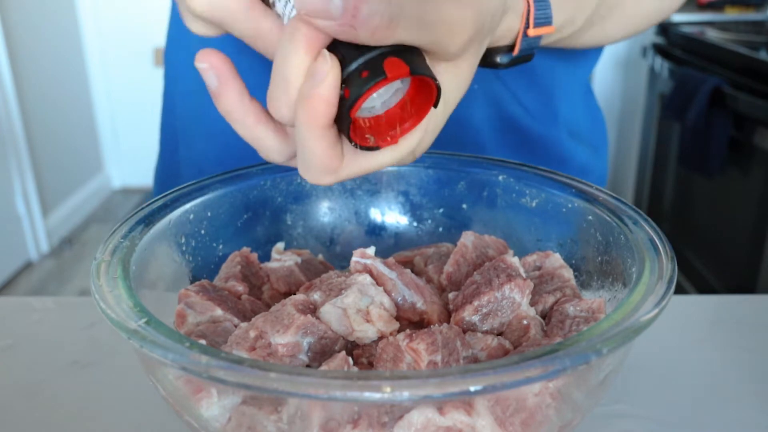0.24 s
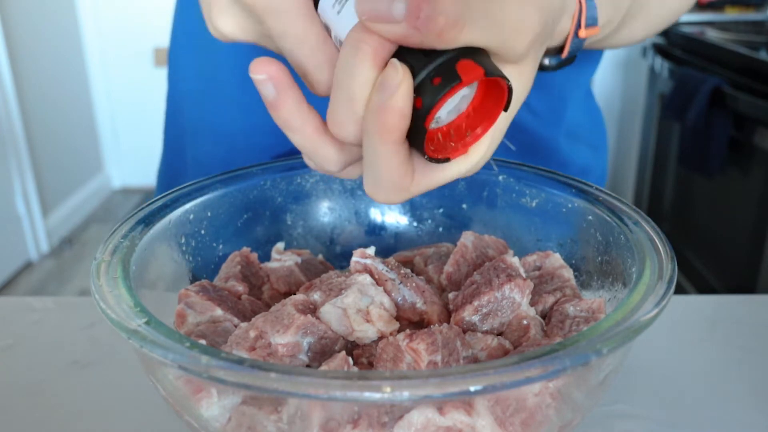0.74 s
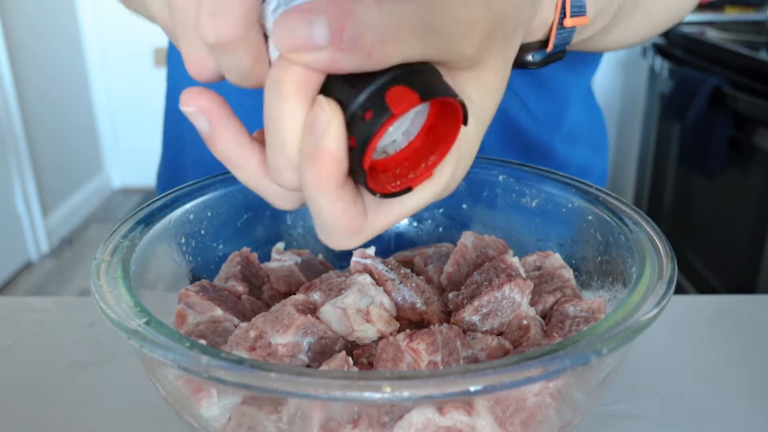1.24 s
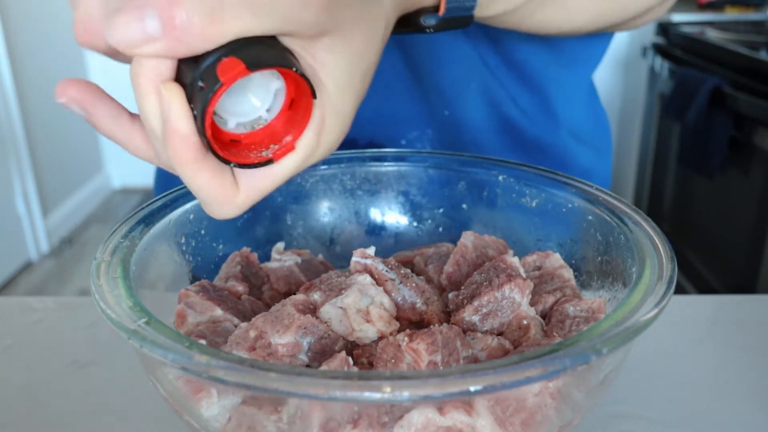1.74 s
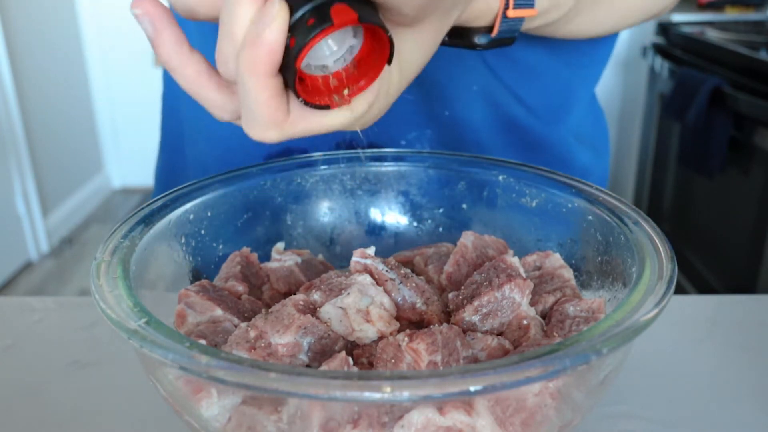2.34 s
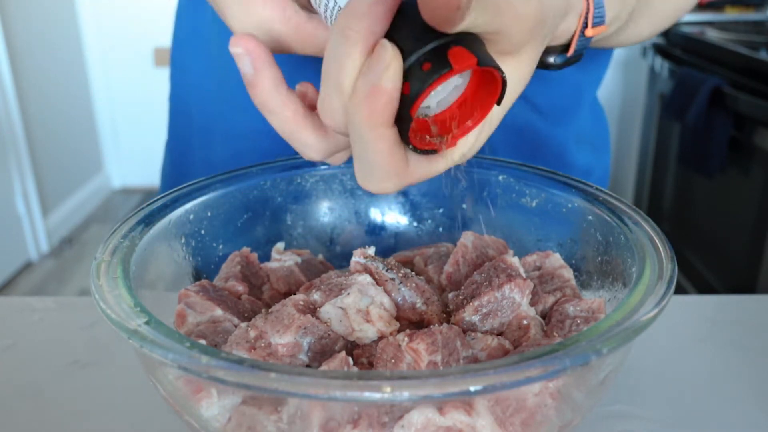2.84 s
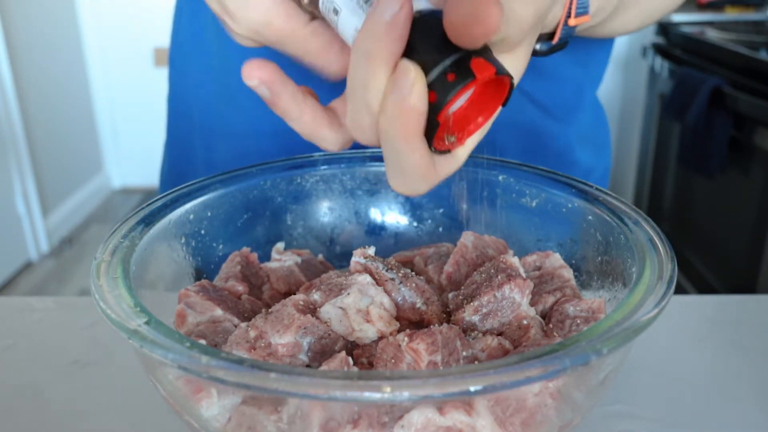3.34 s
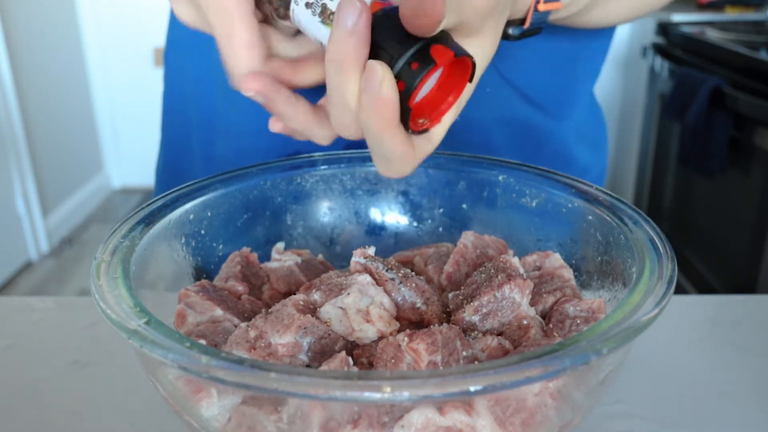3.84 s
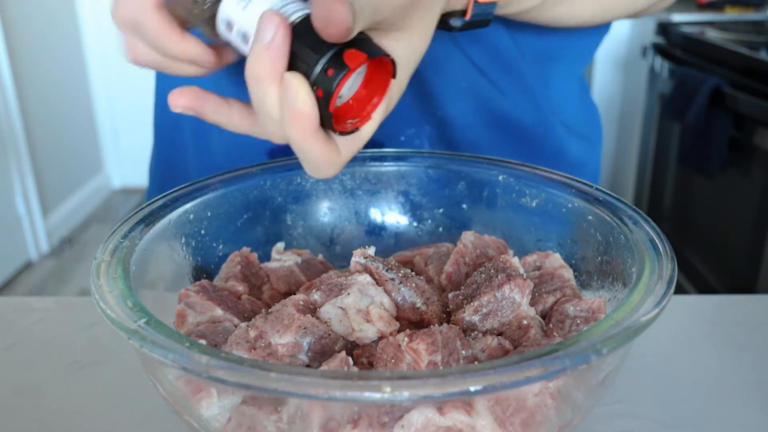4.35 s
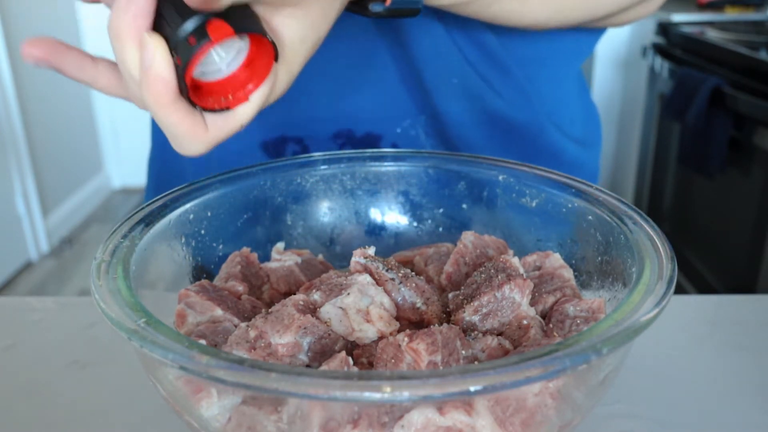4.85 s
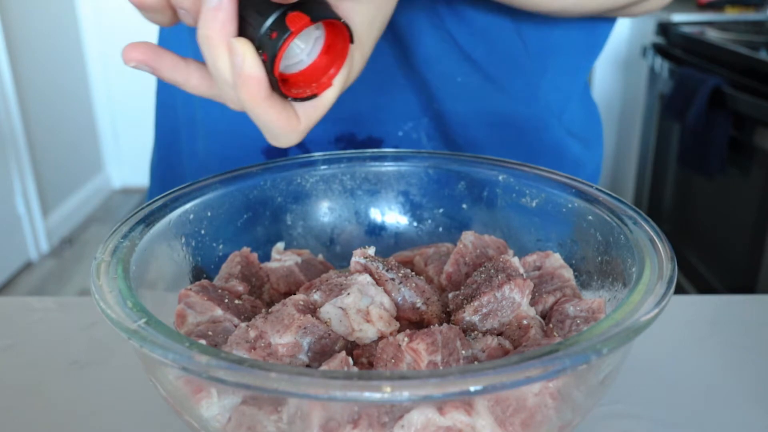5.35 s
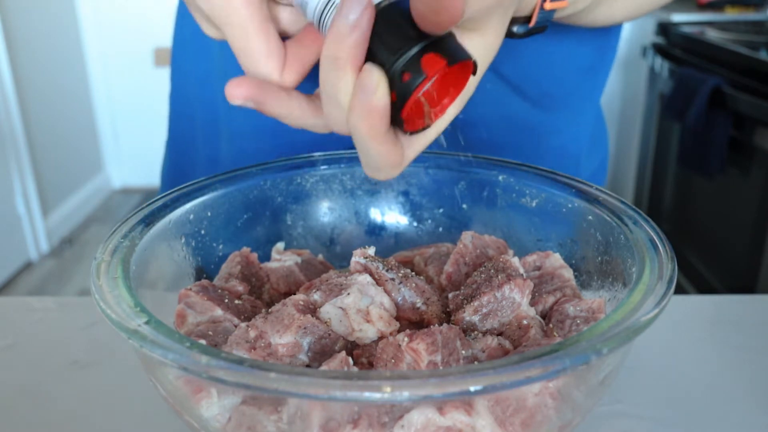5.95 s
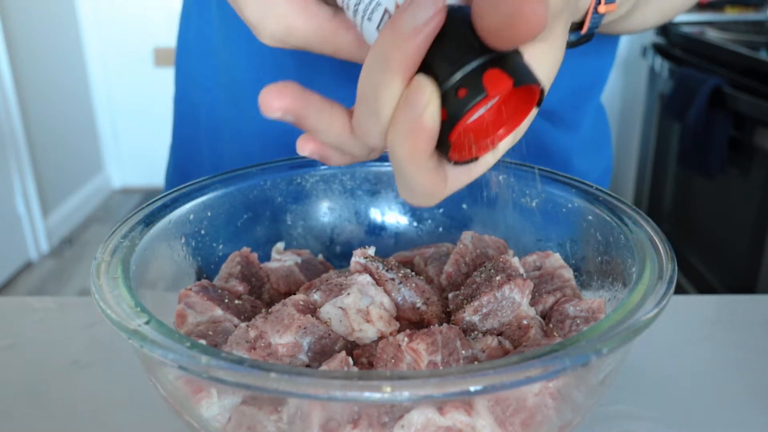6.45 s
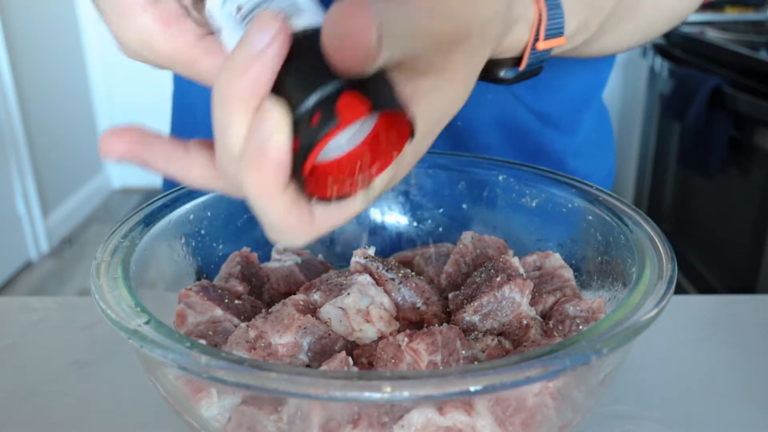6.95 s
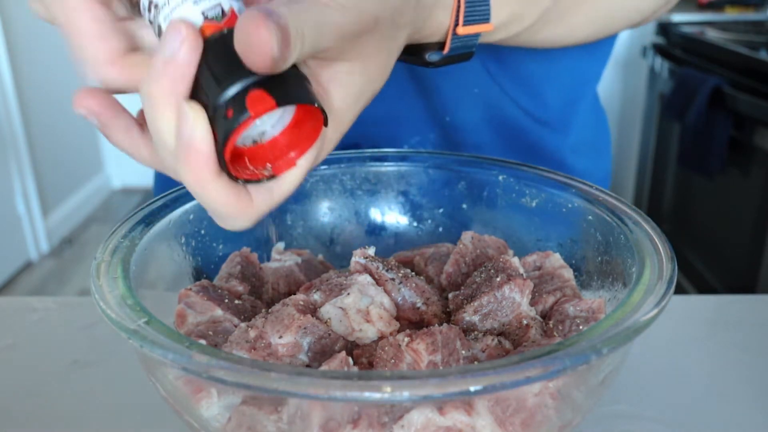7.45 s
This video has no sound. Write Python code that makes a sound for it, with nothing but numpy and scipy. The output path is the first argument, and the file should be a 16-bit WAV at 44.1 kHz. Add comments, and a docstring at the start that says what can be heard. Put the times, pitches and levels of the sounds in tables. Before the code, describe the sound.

Close, dry bursts of crackling peppercorns from a hand grinder, about two a second, with tiny rattles between twists in a quiet kitchen.

```python
"""Sixteen twists of a hand pepper grinder crackle close by in a small, hard kitchen, over low rumble, hiss and hum.
Whole peppercorns crack and pieces chip: short noise bursts shaped by the body's spectrum, harder as grip and speed grow.
Crumbs and loose corns are showers of tiny noise grains; between twists corns slide and tick in the bottle.
Decaying modes make the bottle ring; echoes and a diffuse tail make the room; a fast limiter holds the peaks."""
import sys
import numpy as np
from scipy import signal
from scipy.fft import rfft, irfft
from scipy.io import wavfile
from scipy.ndimage import uniform_filter1d, minimum_filter1d

SR = 44100
rng = np.random.default_rng(int(sys.argv[2]) if len(sys.argv) > 2 else 0)


def store_pcm(level_fs):
    """Save levels as 16-bit WAV."""
    pcm = np.round(np.clip(level_fs, -1, 1) * 32767).astype(np.int16)
    wavfile.write(sys.argv[1], SR, np.atleast_2d(pcm).T)


N = 340011

# pushes of the wrist, two twists taking a second push: [start/s, end/s, relative chip level/dB, relative crumb level/dB,
# growth of force over the push/dB, knock below about 1 kHz/dB, hollow near 2 kHz/dB, bite near 5 kHz/dB, hand rumble/dB]
PUSHES = [(0.264, 0.323, -20, -58, 8, -5, -5, 3.5, -48), (0.779, 0.835, -25, -26, 10, -3.5, 6, -8, -58),
          (0.872, 0.93, -28, -42, -6, -1.5, 5, 3, -62), (1.355, 1.409, -22.5, -30, -44, 4, 5, 1, -58),
          (1.444, 1.494, -20, -32, -4, -0.5, -6, 1, -52),
          (1.84, 1.977, -27.5, -32.5, -2.5, 1.5, 6.5, 0.5, -60),
          (2.315, 2.433, -25.5, -29, -1.5, 0.5, 6, 5, -63),
          (2.778, 2.901, -26, -28.5, -13, 0.5, -2, 1, -58.5), (3.237, 3.344, -31, -31, 1.5, -1, 4, -7, -59),
          (3.689, 3.762, -25, -28, -12, 2.5, 1.5, 1, -64.5),
          (4.151, 4.251, -24.5, -28, -14, -1, 5, -1, -57), (4.582, 4.687, -31, -32, 10, -2.5, 7, 6, -62),
          (5.01, 5.12, -24.5, -27.5, -2, 1.5, 8.5, 6.5, -55.5),
          (5.46, 5.601, -27.5, -32.5, -10, 3, 4, 3, -58.5), (5.912, 5.997, -28, -30, 2.5, 2.5, 8.5, 5, -60),
          (6.408, 6.476, -19, -27.5, -8, -1.5, -3, 4, -51.5),
          (6.844, 6.966, -28, -31, -11.5, 4, 5.5, -1, -52), (7.292, 7.389, -21.5, -25.5, 4, 2, 5, 3, -56)]
# grinder body as a fracture excites it: [f/Hz, relative spectral level/dB]
BODY_SPECTRUM = [(59, -26.5), (100, -20.5), (200, -22), (340, -19), (480, -17), (676, -16.5), (768, -17),
                 (930, -16), (991, -17.5), (1550, -9), (2520, -3.5), (3050, -5.5), (3620, 0), (4870, -1.5),
                 (5900, -8), (9610, 4), (12700, -7.5), (16000, -22.5)]


def amp(db):
    """Decibels to gain."""
    return 10 ** (np.asarray(db) / 20)


def evened(x):
    """Scales to an rms of one."""
    return x / np.sqrt(np.mean(x ** 2) + 1e-20)


def read(points, hz, axis=1):
    """Reads one column of a table on a log-frequency axis."""
    table = np.transpose(points)
    return np.interp(np.log(hz + 1), np.log(table[0] + 1), table[axis])


def add(mix, s, sound):
    """Adds a stereo sound to the mix at time s."""
    part = mix[:, max(round(s * SR), 0):][:, :sound.shape[1]]
    part += sound[:, :part.shape[1]]


def causal(db):
    """Minimum-phase response with this gain: it rings only after the blow."""
    log_gain = np.log(amp(np.concatenate([db, db[-2:0:-1]])))
    return np.exp(np.conj(signal.hilbert(log_gain)))[:len(db)]


def coloured(x, spectrum, size=2048):
    """Passes a pair of channels through a unit-energy body response with this spectrum."""
    ring = irfft(causal(read(spectrum, np.fft.rfftfreq(size, 1 / SR))))
    ring = ring / np.linalg.norm(ring)
    return signal.oaconvolve(x, ring[None], axes=1)[:, :N]


def ports(pair, axis, lag_samples=1):
    """Makes two unrelated signals partly alike per band; near sound (axis 1) reaches the left port first."""
    # likeness of the two microphone ports: [f/Hz, correlation of near sound, correlation of room sound]
    likeness = [(40, .1, -0.27), (130, 0.13, -0.47), (400, 0.8, 0.38), (2460, 1, 0.58), (4230, 0.8, 0.6),
                (5770, 0.087, -0.1), (9000, 0.87, 0.1), (13900, 0.2, -0.6)]
    left, other = rfft(pair)
    hz = np.fft.rfftfreq(pair.shape[1], 1 / SR)
    same = np.clip(read(likeness, hz, axis=axis), -.7, 1)
    lag = np.exp(-2j * np.pi * hz * lag_samples / SR) if axis == 1 else 1
    right = (same * left + np.sqrt(1 - same ** 2) * other) * lag
    return irfft(np.array([left, right]), pair.shape[1])


def background(air_db=-54.5, waver_rad=0.33, hands_db=0, swell_s=0.11, rumble_hz=70):
    """Low rumble that swells with each push, steady hiss of the room, and a hum of slightly wavering phase."""
    # quiet kitchen: [f/Hz, relative spectral level/dB]
    air_spectrum = [(20, 13), (77, 2), (134, -5), (204, -5), (293, -10), (400, -11.5), (1090, -24.5),
                    (2080, -20), (4420, -17.5), (6180, -25.5), (9400, -20.5), (12000, -22.5), (15500, -46)]
    # drifting room rumble: [t/s, level/dB]
    rumble_drift = [(0, -63), (1.1, -59), (1.8, -53), (3.5, -64), (4.4, -63), (5.1, -58), (5.45, -61),
                    (6.7, -63), (7.1, -50.5), (7.4, -67), (7.7, -55.5)]
    # appliance hum: [f/Hz, rms level/dB]
    hum_tones = [(59.5, -72.5), (121, -69), (162, -73.5), (285, -74)]
    t, hz = np.arange(N) / SR, np.fft.rfftfreq(N, 1 / SR)
    noise = ports(rng.standard_normal((2, N)), axis=2)
    air = evened(irfft(rfft(noise) * amp(read(air_spectrum, hz)), N))
    low = irfft(rfft(air) * np.exp(-(hz / rumble_hz) ** 2), N)

    hands = np.zeros(N)
    for start, end, *_, rumble_db in PUSHES:
        middle = (start + end) / 2
        hands += amp(rumble_db) / (1 + ((t - middle) / swell_s) ** 2) ** 2
    rumble = evened(low) * (amp(np.interp(t, *np.transpose(rumble_drift))) + amp(hands_db) * hands)

    hum = np.zeros(N)
    for (f, db), knots in zip(hum_tones, rng.standard_normal((len(hum_tones), 40))):
        drift = np.interp(t, np.linspace(0, t[-1], len(knots)), knots)
        hum += amp(db) * np.sqrt(2) * np.sin(2 * np.pi * f * t + waver_rad * drift)
    return amp(air_db) * (air - low) + rumble + hum


def room_tail(build_s=0.001, size=256):
    """Diffuse reflections, unit energy at left: noise whose bands decay at their own rates, lows slowest."""
    # kitchen tail: [f/Hz, t60/s, relative level/dB]
    decay_bands = [(150, 0.98, 3), (600, 0.46, -3.5), (1720, 0.39, 5), (3900, 0.38, 3), (7340, .39, 3.5),
                   (9500, 0.47, -6), (12800, 0.31, 1), (15400, 0.3, 13.5)]
    hz, t, z = signal.stft(ports(rng.standard_normal((2, SR)), axis=2), SR, nperseg=size)
    z = z * amp(read(decay_bands, hz, axis=2)[:, None] - 60 * t / read(decay_bands, hz)[:, None])
    build = 1 - np.exp(-np.arange(SR) / SR / build_s)
    tail = signal.istft(z, SR, nperseg=size)[1][:, :SR] * build
    return tail / np.linalg.norm(tail[0])


def kitchen(x, tail_db=-8, echo_db=0, count=3, step_s=.013):
    """A few near echoes, then a diffuse tail whose fine pattern keeps crossfading among a few versions."""
    # echoes from bowl, counter and cupboards: [delay/s, level/dB]
    reflections = [(.0021, -21), (.0066, -24), (.0101, -23), (0.0125, -19.5), (.0165, -18.5),
                   (.0185, -26.5), (.0319, -24)]
    echoes = np.zeros((2, SR // 20))
    for (s, db), skew in zip(reflections, rng.integers(-3, 4, len(reflections))):
        delay = round(s * SR)
        echoes[[0, 1], [delay, delay + skew]] += amp(db + echo_db)  # each from its own side
    out = signal.fftconvolve(x[:1], echoes, axes=1)[:, :N]

    position = np.arange(N) / SR / step_s
    for k in range(count):
        share = np.sqrt(np.maximum(1 - abs((position - k) % count - 1), 0))
        for side in x:  # each side of the grinder radiates towards other walls
            out += amp(tail_db) * signal.fftconvolve((side * share)[None], room_tail(), axes=1)[:, :N]
    return out


def snap(burst, decay_s, spectrum_db, size=57):
    """One fracture of unit energy per channel: a fast-decaying broadband burst of tiny breaks in the body."""
    t = np.arange(burst.shape[1]) / SR
    z = rfft(burst * np.exp(-t / max(decay_s, 1e-4)))
    # the breaks excite all bands alike: take out the burst's own spectral swings
    swings_db = 10 * np.log10(uniform_filter1d(abs(z) ** 2, size, axis=1) + 1e-12)
    sound = irfft(z * [causal(spectrum_db - swing_db) for swing_db in swings_db])
    return sound / np.linalg.norm(sound, axis=1, keepdims=True)


def grains(per_s, spread_db, decay_s, size=512):
    """A shower of tiny fractures: decaying noise at random moments, a few much larger than the rest."""
    sizes = amp(spread_db * np.minimum(rng.exponential(1, N), 3))
    sizes = sizes * (rng.random(N) < per_s / SR)
    decay = np.exp(-2 * np.arange(size) / SR / decay_s)  # of power
    power = signal.oaconvolve(sizes ** 2, decay)[:N]
    return evened(np.sqrt(abs(power)) * rng.standard_normal((2, N)))


def loose_corns(gain_db=-4, rest_db=-64, slide_db=-9, slide_hz=9700, slide_octaves=0.12,
                tick_db=7, tick_decay_s=0.0011, size=2048):
    """Corns slide and tick in the bottle as the grip changes: grains, one high noise resonance, short snaps."""
    # slides: [t at the fastest/s, relative level/dB, Gaussian half-length/s]
    slide_rows = [(0.064, -51, 0.049), (0.121, -44, 0.018), (0.602, -43, 0.026), (1.115, -45, 0.015),
                  (1.173, -38.5, 0.021), (1.304, -45.5, 0.016), (1.67, -49, .025), (1.751, -38, 0.015),
                  (2.17, -57.5, .07), (2.592, -34.5, 0.0074), (2.662, -52.5, 0.18), (3.034, -62, 0.037),
                  (3.14, -54, 0.019), (3.505, -51, .02), (3.584, -52.5, 0.025), (4.086, -57.5, 0.04),
                  (4.473, -56.5, 0.058), (4.833, -46, 0.0087), (4.892, -52.5, 0.05), (5.361, -48, 0.031),
                  (5.742, -40.5, 0.007), (6.109, -57, .025), (6.234, -44, 0.004), (6.33, -48, 0.043),
                  (6.676, -41.5, 0.0054), (6.782, -52.5, 0.052), (7.102, -38, 0.014), (7.24, -54, 0.069),
                  (7.66, -50.5, 0.023)]
    # ticks against the bottle: [t/s, relative level/dB]
    tick_rows = [(0.237, -49), (0.5666, -32), (0.593, -31), (0.7334, -34), (1.1103, -29), (1.1447, -41),
                 (1.2882, -27), (2.076, -30), (2.5876, -42), (2.6867, -38), (2.9274, -17), (3.5066, -29),
                 (4.002, -31), (4.4387, -30.5), (4.832, -38), (5.3524, -26), (5.736, -32), (6.0488, -18),
                 (6.156, -34), (6.2336, -54), (6.301, -28.5), (7.106, -26), (7.576, -36), (7.668, -28.5)]
    # rustle of loose corns: [f/Hz, relative spectral level/dB]
    rustle_spectrum = [(350, -40), (600, -29), (906, -25), (1100, -35), (2070, -11), (3680, -12),
                       (4460, -8.5), (6200, -20), (8160, -9.5), (9620, 5), (10500, -3), (11300, -6.5),
                       (13400, -11), (15400, -24.5), (16000, -20.5)]
    t, hz = np.arange(N) / SR, np.fft.rfftfreq(N, 1 / SR)
    motion = np.full(N, amp(rest_db))
    for s, db, half_s in slide_rows:
        motion += amp(db) * np.exp(-.5 * np.minimum(((t - s) / half_s) ** 2, 40))
    shower = grains(per_s=500, spread_db=3.8, decay_s=.0011)
    out = amp(gain_db) * coloured(shower * motion, rustle_spectrum)

    resonance = 1 / (1 + (np.log2((hz + 1) / slide_hz) / slide_octaves) ** 2)
    whisper = evened(irfft(rfft(rng.standard_normal((2, N))) * resonance, N))
    out += amp(slide_db) * motion * whisper

    rustle_db = read(rustle_spectrum, np.fft.rfftfreq(size, 1 / SR))
    for (s, db), burst in zip(tick_rows, rng.standard_normal((len(tick_rows), 2, size))):
        add(out, s, amp(db + tick_db) * snap(burst, tick_decay_s, rustle_db))
    return out


def turning(t, start, end, rise_s=0.024, fall_s=0.028, linger_s=0.013):
    """Speed of the bottle during one push, 0-1: it rises, holds and falls, lingering past the end."""
    return np.clip(np.minimum((t - start) / rise_s, (end + linger_s - t) / fall_s), 0, 1)


def crumbs(gain_db=0.5, slack_db=-48, slack_s=0.014):
    """The burrs scrape faintly as they take up the slack, then mill fragments finer while the bottle turns."""
    t = np.arange(N) / SR
    milling = np.zeros(N)
    for start, end, _, crumb_db, *_ in PUSHES:
        milling += amp(crumb_db) * turning(t, start, end)
        milling += amp(slack_db) * np.maximum(1 - abs(t - start) / slack_s, 0)
    shower = grains(per_s=900, spread_db=3.5, decay_s=.0007)
    return amp(gain_db) * coloured(shower * milling, BODY_SPECTRUM)


def jolts(gain_db=0, push_s=0.00097, right_db=1, size=2048):
    """The hardest cracks jolt the grinder: a dull push of air with no ring, as the burrs give way."""
    # jolts: [t/s, relative level/dB]
    jolt_rows = [(0.259, -39), (0.284, -37), (0.36, -43), (0.778, -40), (0.881, -29.5), (0.913, -42),
                 (1.353, -31), (1.379, -54), (1.457, -28.5)]
    out, u = np.zeros((2, N)), np.arange(size) / SR / push_s
    pulse = u * (2 - u) * np.exp(1 - u)
    for s, db in jolt_rows:
        add(out, s, amp([[db + gain_db], [db + gain_db + right_db]]) * pulse)
    return out


def fracture(db, decay_s, colour_db, burst, knock_hz=1100, hollow_hz=2150, bite_hz=4900,
             hollow_octaves=0.62, bite_octaves=0.24, usual_s=0.002, usual_db=-11.5,
             knock_db_per_doubling=5, knock_db_per_db=-0.13):
    """One break in the burrs, coloured by (knock, hollow, bite) in dB; slow, soft breaks knock more."""
    hz = np.fft.rfftfreq(burst.shape[1], 1 / SR)
    knock = 1 / (1 + (hz / knock_hz) ** 4)  # the jolt that reaches the whole mill
    hollow = np.exp(-.5 * (np.log2((hz + 1) / hollow_hz) / hollow_octaves) ** 2)
    bite = np.exp(-.5 * (np.log2((hz + 1) / bite_hz) / bite_octaves) ** 2)
    knock_db, hollow_db, bite_db = colour_db
    slowness_db = knock_db_per_doubling * np.log2(abs(decay_s / usual_s) + 1e-9)
    knock_db = knock_db + slowness_db + knock_db_per_db * (db - usual_db)
    spectrum_db = read(BODY_SPECTRUM, hz) + knock_db * knock + hollow_db * hollow + bite_db * bite
    return amp(db) * snap(burst, decay_s, spectrum_db)


def chips(gain_db=21, spread_db=2.5, decay_s=0.002, decay_octaves=.7, teeth_per_s=120, count=18, size=1024):
    """Pieces of corn chip at uneven moments as the teeth pass, following the speed and force of the push."""
    # chance variation of a chip's colour: [knock/dB, hollow/dB, bite/dB]
    scatter_db = [3.0, 3.5, 3.5]
    out = np.zeros((2, N))
    for start, end, chip_db, _, growth_db, *colour_db, _ in PUSHES:
        times = start + (np.arange(count) + rng.random(count)) / teeth_per_s
        chance = np.clip(rng.standard_normal((count, 5)), -2, 2)
        bursts = rng.standard_normal((count, 2, size))
        for s, (strength, slow, *own), burst in zip(times[times < end], chance, bursts):
            progress = (s - start) / (end - start)
            db = chip_db + growth_db * (progress - .5) + spread_db * strength
            chip_s = decay_s * 2 ** (decay_octaves * slow)
            chip = fracture(db, chip_s, np.multiply(scatter_db, own) + colour_db, burst)
            add(out, s, amp(gain_db) * turning(s, start, end) * chip)
    return out


def cracks(gain_db=21, size=2048):
    """Whole corns break at various places in the burrs, each with its own colour; the nearest push sets the knock."""
    # cracks: [t/s, relative level/dB, fracture decay/s, hollow near 2 kHz/dB, bite near 5 kHz/dB]
    crack_rows = [(0.2597, -1.5, 0.00052, -3.5, -7.5), (0.274, -11.5, 0.0012, -3, 1),
                  (0.2849, -6, 0.0021, -2, -7.5), (0.2923, -14.5, 0.0007, 2.5, -5),
                  (0.2984, -10, 0.00036, -6.5, -18), (0.3052, -16, 0.0011, 10.5, 4),
                  (0.3123, -15, 0.0012, 2.5, -2.5), (0.3264, -18, 0.00065, 0, 1),
                  (0.3597, -11.5, 0.0013, 0, -8.5), (0.362, -8, 0.002, 1, 1),
                  (0.371, -10.5, 0.00089, -1, -8.5), (0.77, -26.5, .0013, -21, 3.5),
                  (0.78, -8, 0.0013, 0.5, 7.5), (0.7886, -16, 0.0049, 5, -12.5),
                  (0.8106, -14, 0.00075, -0.5, 2), (0.8261, -7.5, 0.0018, -16, 0),
                  (0.8675, -17.5, .0006, 0, 5.5), (0.8763, -11.5, 0.00052, -14, 7.5),
                  (0.8819, -3, 0.0011, -1, -18.5), (0.8906, -14.5, 0.0007, 0, -1.5),
                  (0.8977, -9.5, 0.001, -5, -2.5), (0.914, -3, 0.0018, 1, -1.5),
                  (0.9242, -15, .0009, -3, 1.5), (1.354, -6, 0.0015, -5, 0), (1.383, -7.5, 0.00085, -6, 1),
                  (1.3938, -12.5, 0.0023, 8.5, -2), (1.413, -16, 0.0012, 9, 3),
                  (1.4483, -18.5, 0.00056, -5.5, 3), (1.4579, -8.5, 0.0015, 4, -3),
                  (1.4735, -14, 0.0006, 0.5, -3), (1.846, -29, 0.00084, -2.5, -1.5),
                  (1.861, -18.5, 0.006, 1.5, 3), (1.907, -18.5, 0.0032, 10, 0.5),
                  (1.9219, -16, 0.00063, 2.5, -1), (1.938, -17, 0.0015, 15.5, -4),
                  (1.9421, -14, 0.00053, -1, -11.5), (2.311, -30, 0.0013, 2, 5),
                  (2.3298, -22, 0.0031, 13.5, 9), (2.3353, -18, 0.0011, 1.5, -1),
                  (2.357, -17, 0.0028, 6, 6), (2.3641, -15, 0.0034, -5, -17),
                  (2.3691, -16.5, 0.00068, 6.5, 2.5), (2.395, -22, .0016, 9, -0.5),
                  (2.3999, -17, 0.00047, -2, 0), (2.7811, -26.5, 0.0017, 0, -7),
                  (2.8026, -8, 0.00031, -9, -19), (2.8374, -23, 0.00098, -2.5, 16),
                  (2.855, -25, .002, 11, 1), (2.8703, -15.5, 0.00053, -6, -3), (3.3055, -16, 0.00066, 3, 1),
                  (3.3089, -18, 0.00087, -10, 1), (3.316, -8.5, 0.00058, -9, -3),
                  (3.3441, -19, 0.0016, 6, 3), (3.7164, -24, 0.0012, -9, 6), (3.725, -18, 0.0032, -4.5, -9),
                  (3.757, -22, .0005, 2, 27), (3.7649, -16, 0.00054, -19, 8.5),
                  (3.768, -12, .0003, -10, -10), (3.7719, -18, 0.0041, 8.5, -16.5),
                  (4.142, -17, 0.00034, -7, 4.5), (4.156, -3.5, 0.0013, 1, 4),
                  (4.1917, -18, 0.0048, 13.5, 5.5), (4.2064, -12.5, 0.0013, 2, 1),
                  (4.24, -10.5, 0.00039, -4.5, -4), (4.5963, -23.5, .0012, 3, -9),
                  (4.632, -22, 0.0012, -2.5, 1), (4.661, -16.5, 0.0025, 7.5, -5.5),
                  (4.6808, -23.5, 0.00018, 8, -6), (4.6861, -20.5, 0.00074, 4, 4),
                  (5.0161, -11, 0.0017, 3.5, 4), (5.0363, -15, 0.00082, 4, -5),
                  (5.042, -13, 0.00027, -3.5, 3), (5.0537, -17, 0.0017, 10, 3), (5.068, -16, 0.0037, 11, 6),
                  (5.0715, -13, 0.0014, 6, 5.5), (5.0985, -15, 0.00025, 0, 2), (5.471, -19, 0.00057, 1, 5),
                  (5.4737, -17.5, 0.00079, 4, 0), (5.4961, -16, 0.0012, -6, 2),
                  (5.508, -18, 0.0021, 12, -2), (5.552, -18.5, 0.0011, 7, 7),
                  (5.5825, -14.5, 0.00019, -0.5, -2), (5.894, -25.5, 0.00058, 7, 2),
                  (5.9058, -22, 0.0012, -17, -2), (5.9237, -12.5, 0.0015, 3, -2),
                  (5.9365, -17.5, 0.002, 7, -4), (5.9507, -17.5, 0.0022, 7, -2),
                  (6.4061, -6.5, 0.0017, 7.5, 1.5), (6.4194, -11.5, 0.00066, -20, 7),
                  (6.4528, -9.5, 0.0019, -3.5, -5), (6.8526, -26, .003, 11, -4),
                  (6.87, -24.5, 0.0059, 5, -16), (6.8972, -21, 0.006, -5, 8), (6.929, -15, 0.002, 1, 2),
                  (7.318, -27, 0.003, 6, 10), (7.336, -14, 0.0023, 4, -3), (7.3455, -18.5, .0024, -2.5, 8),
                  (7.3613, -23, .0016, 10.5, 12.5), (7.3645, -17, 0.00066, 6.5, -6),
                  (7.373, -31, 0.0023, 14.5, 3), (7.386, -19, .0005, -9.5, -12)]
    out = np.zeros((2, N))
    starts, ends, _, _, _, knocks_db, *_ = np.transpose(PUSHES)
    bursts = rng.standard_normal((len(crack_rows), 2, size))
    for (s, db, decay_s, hollow_db, bite_db), burst in zip(crack_rows, bursts):
        knock_db = knocks_db[np.argmin(abs((starts + ends) / 2 - s))]
        crack = fracture(db, decay_s, (knock_db, hollow_db, bite_db), burst)
        add(out, s, amp(gain_db) * crack)
    return out


def bottle(x, size=4096):
    """The bottle and its cap ring briefly after every blow: a sum of decaying modes."""
    # modes of bottle and cap: [f/Hz, level/dB, t60/s]
    mode_rows = [(313, -35.5, 0.037), (1624, -26, 0.023), (2530, -36.5, 0.04), (4760, -32.5, 0.02),
                 (8900, -45, .03)]
    t, ring = np.arange(size) / SR, np.zeros(size)
    for hz, db, t60_s in mode_rows:
        mode = amp(-60 * t / t60_s) * np.cos(2 * np.pi * hz * t)
        ring += amp(db) * mode / np.linalg.norm(mode)
    return x + signal.oaconvolve(x, ring[None], axes=1)[:, :N]


def scene():
    """The grinder near the microphone, its sound in the room, and the room's own noise."""
    grinder = bottle(cracks() + chips() + crumbs() + loose_corns())
    return ports(grinder, axis=1) + jolts() + kitchen(grinder) + background()


def record(dry, ceiling=1.44, size=31, edge_hz=16000):
    """A fast limiter holds the loudest cracks, whose tips still clip; then a low-pass."""
    allowed = np.minimum(1, ceiling / (abs(dry).max(0) + 1e-9))
    gain = uniform_filter1d(minimum_filter1d(allowed, size), size)
    held = np.clip(dry * gain, -1, 1)
    low_pass = signal.firwin(255, edge_hz, window=("kaiser", 8), fs=SR)
    return signal.oaconvolve(held, low_pass[None], "same")


dry = scene()
out = record(dry)
store_pcm(out)
```